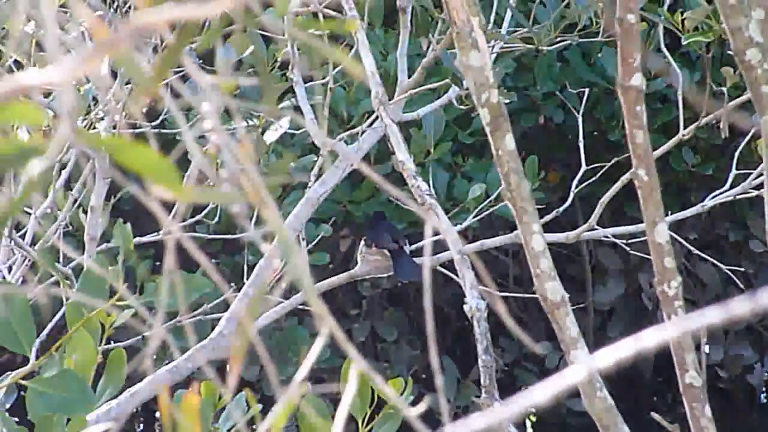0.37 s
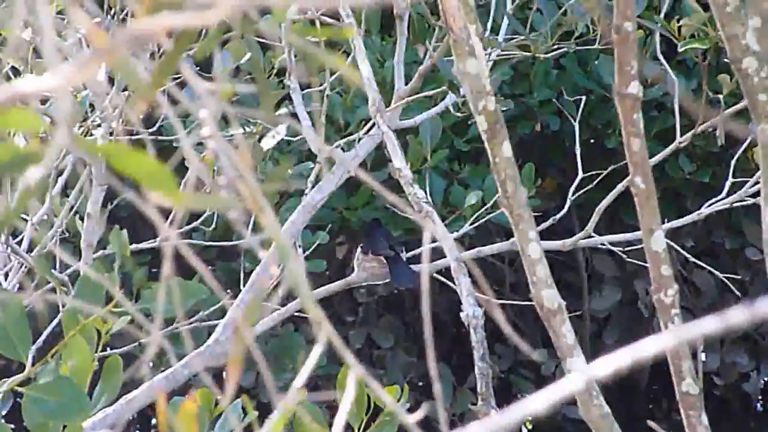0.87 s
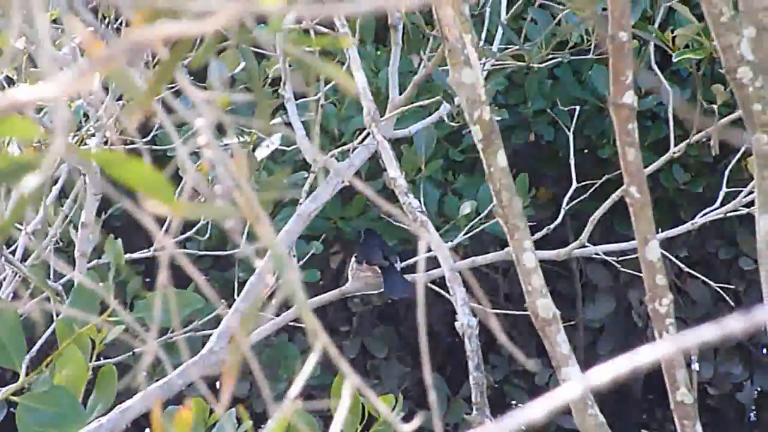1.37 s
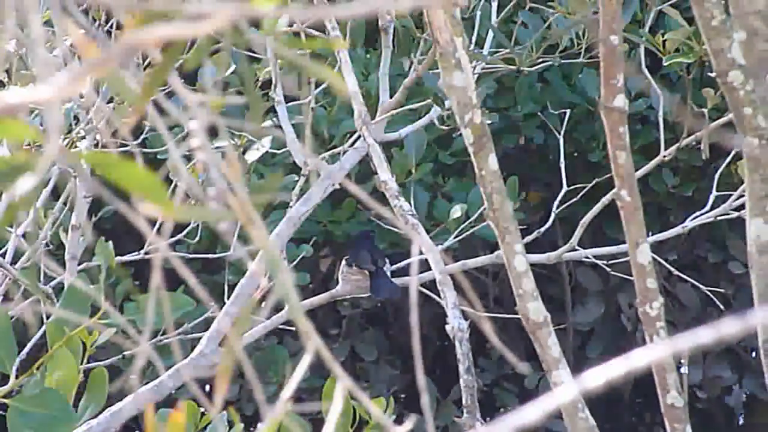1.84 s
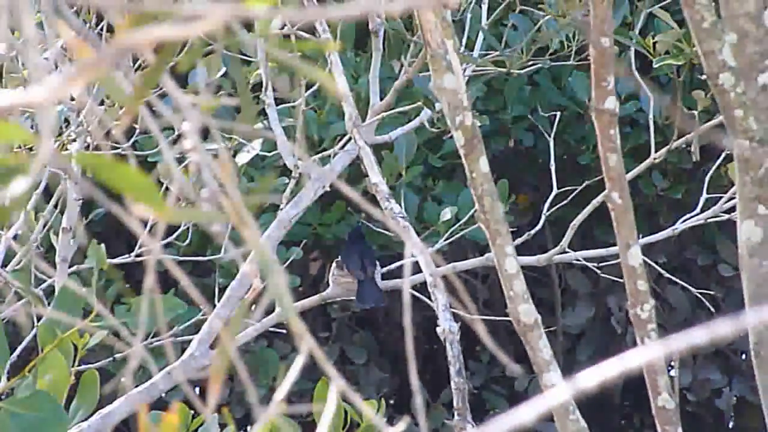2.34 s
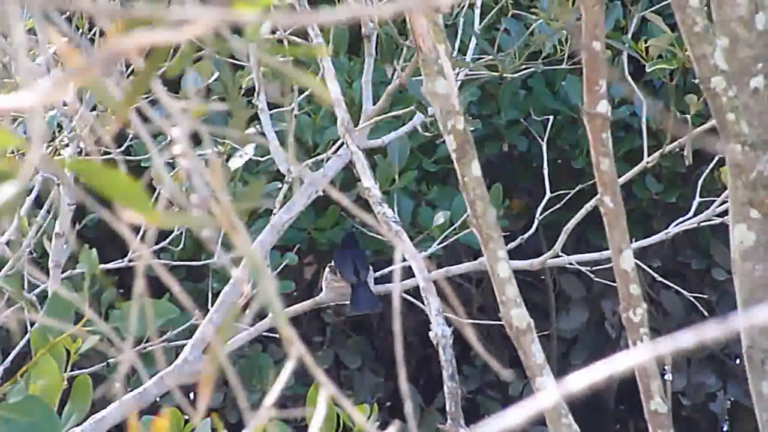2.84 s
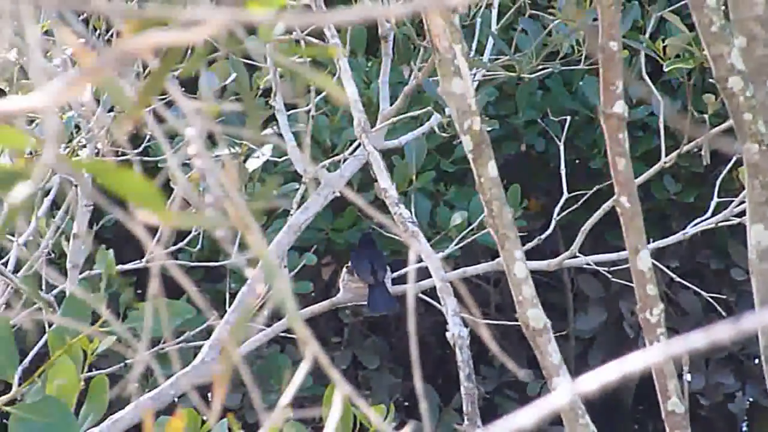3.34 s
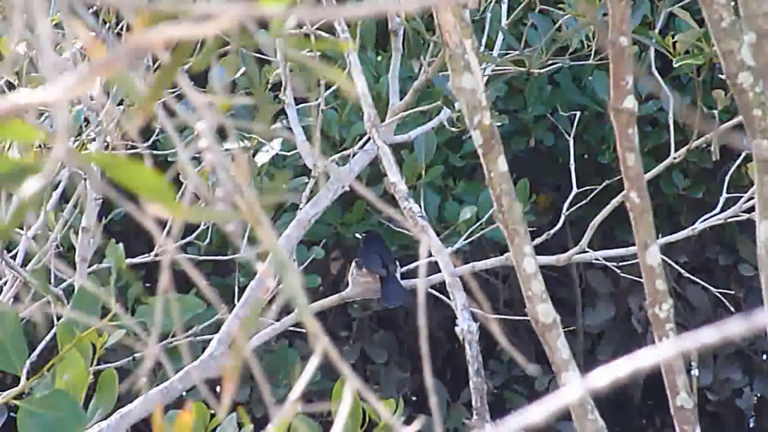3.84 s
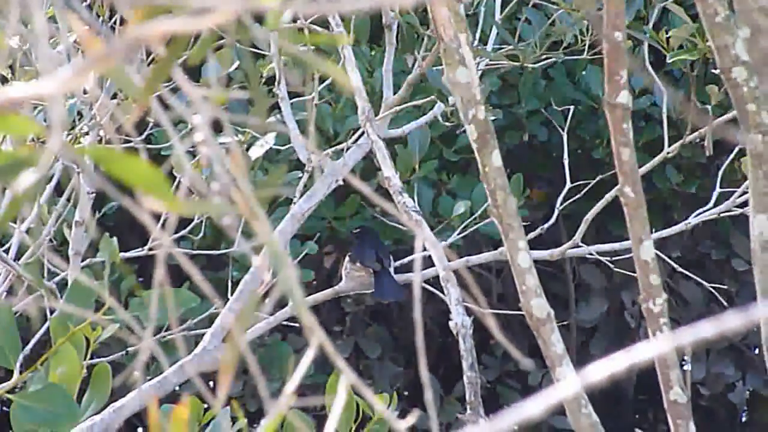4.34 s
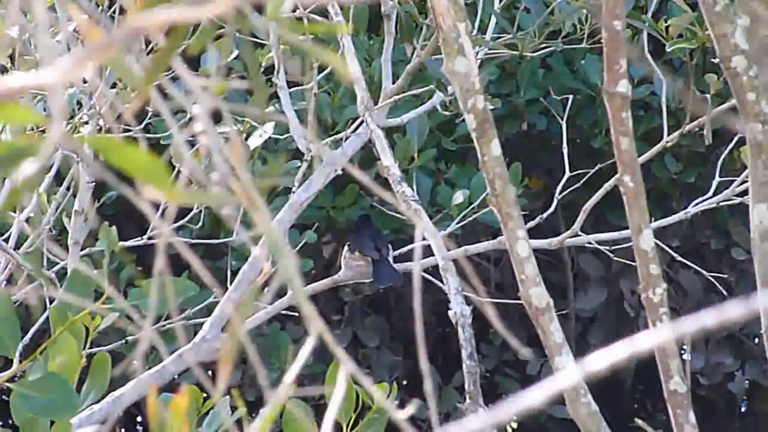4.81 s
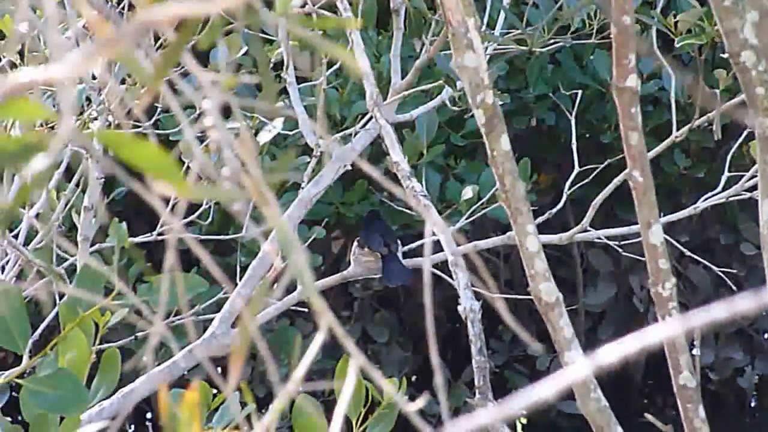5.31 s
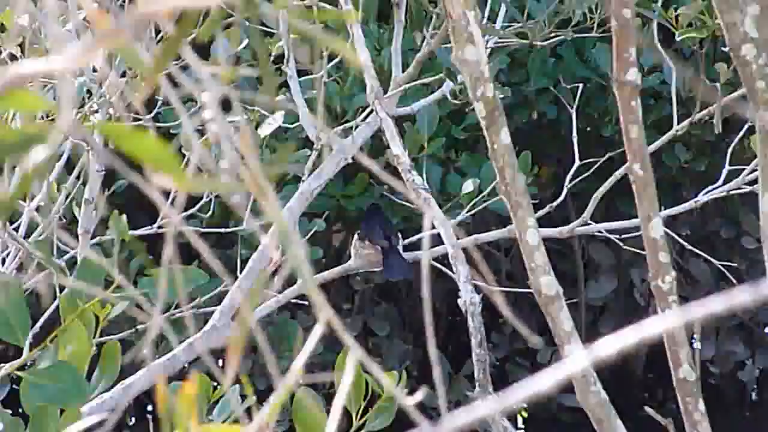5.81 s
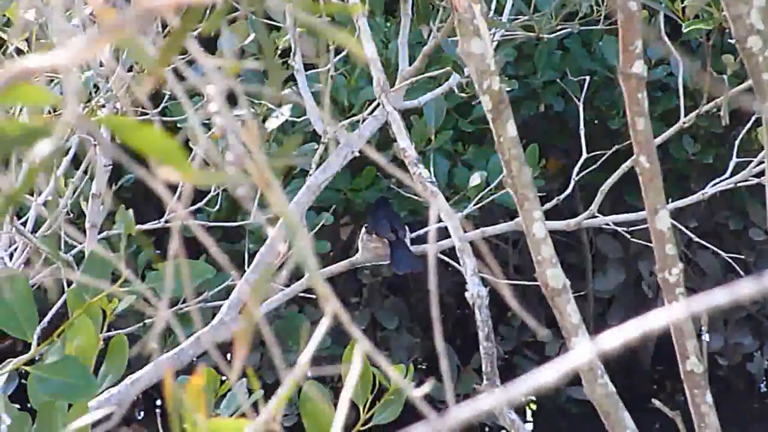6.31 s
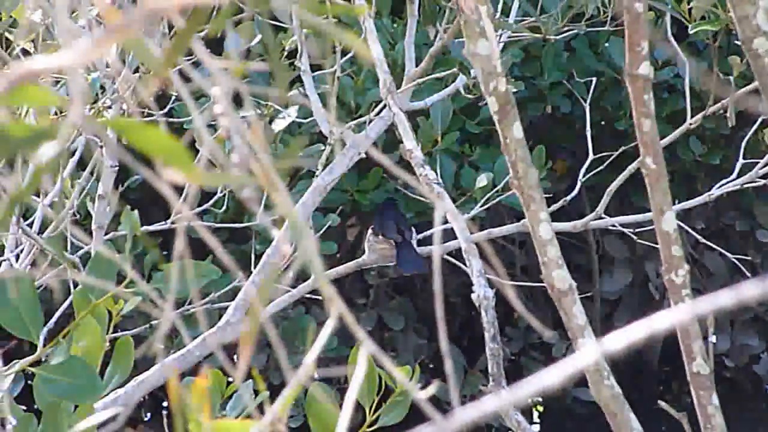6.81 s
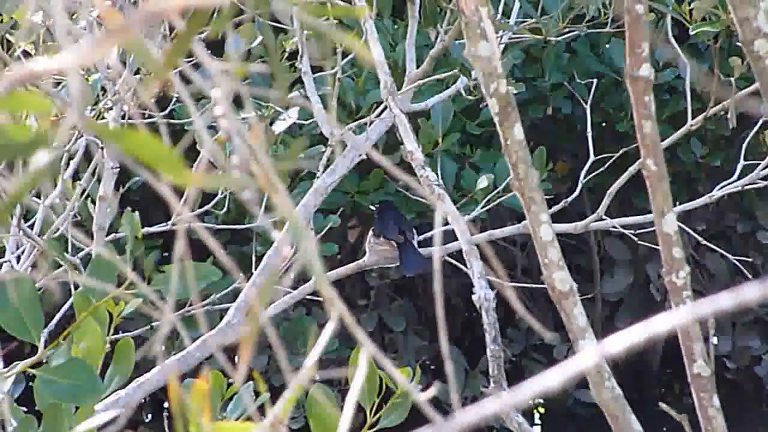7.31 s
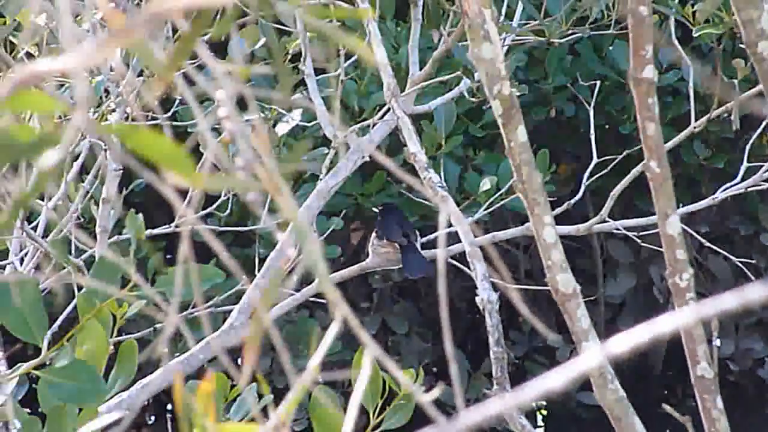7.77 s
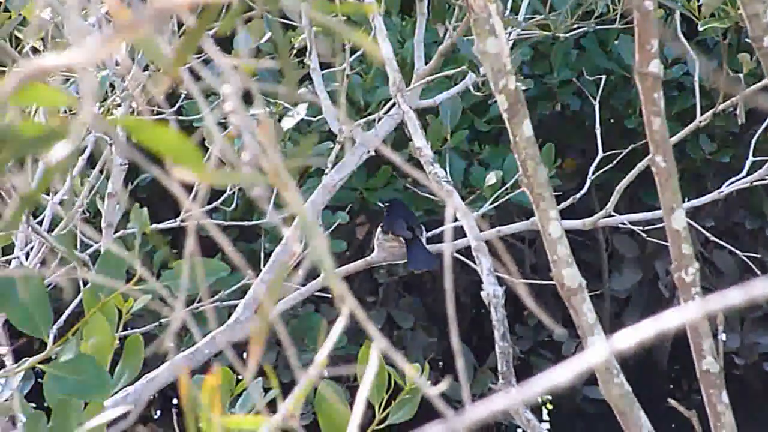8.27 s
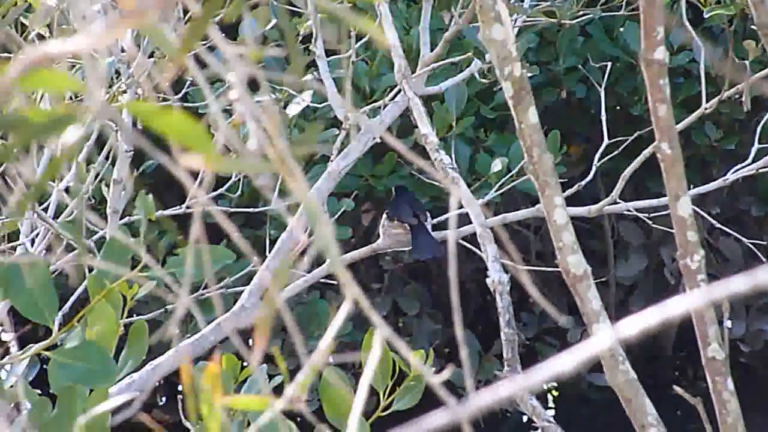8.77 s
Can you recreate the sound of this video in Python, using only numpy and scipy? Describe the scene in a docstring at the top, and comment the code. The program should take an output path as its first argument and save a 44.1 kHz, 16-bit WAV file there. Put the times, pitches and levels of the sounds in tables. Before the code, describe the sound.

A steady soft hiss of air and distant traffic runs throughout, wide and slightly uneven, with little high treble. From 0 to 1.6 s a bird slightly right gives five sharp, bright chips, growing stronger, with faint glides beside it. Around 1 s a bird on the left whistles a quick rising phrase ending in a fall; another comes at 2.9 s and a shorter one at 4.1 s. Between 1.6 and 3.5 s the right bird adds high plunging notes and snappy slurred calls, then two rolled, trill-like calls at 3.9 and 4.3 s. A far bird carols low, soft, overlapping tones from 4 to 7 s, with weak chips near 5.1 and 5.7. At 6.7-7.1 s the left bird flicks and warbles brightly. A faint slur climbs at 7.5 s, soft notes follow near 8, and a final sharp call lands at 8.8. Foliage blurs every note into a short tail.

```python
"""Birds in a thicket, over the steady hiss of air and distant traffic.
At once a bird on the right chatters chips whose octave is loudest, and a fainter one glides farther right.
Soon one on the left whistles stepped phrases; then the chatterer adds drops, slurred calls and rolled calls.
A far bird carols low notes that overlap in two voices; later the left bird flicks and warbles,
and the fainter one sings a long slur. Leaves and trunks scatter every note into a dense tail."""
import sys
import numpy as np
from scipy import signal
from scipy.fft import rfft, irfft, next_fast_len
from scipy.io import wavfile
from scipy.ndimage import uniform_filter1d

SR = 44100
rng = np.random.default_rng(int(sys.argv[2]) if len(sys.argv) > 2 else 0)


def gain_from_decibels(decibels):
    """Convert decibel values to linear amplitude factors."""
    exponent = np.asarray(decibels, float) / 20
    return 10 ** exponent


def file_out(sig):
    """Save sig as 16-bit WAV at sys.argv[1]."""
    # one column per channel
    cols = np.atleast_2d(sig).T
    # limit, then scale
    lim = np.clip(cols, -1, 1)
    pcm = np.round(lim * 32767).astype(np.int16)
    wavfile.write(sys.argv[1], SR, pcm)


N = 392490   # length of the scene in samples


def rms_one(x):
    """Scales a sound to an rms of 1."""
    return x / np.sqrt(np.mean(x ** 2) + 1e-20)


def at_hz(points, hz):
    """Reads a curve of (frequency, value) points on a log-frequency axis."""
    point_hz, value = np.array(points).T
    return np.interp(np.log(hz), np.log(point_hz), value)


def drift(rate_hz, size):
    """Random wandering of spread 1: noise smoothed so that little above rate_hz is left."""
    r = np.exp(-2 * np.pi * rate_hz / SR)
    noise = rng.standard_normal(size + 4000)
    return rms_one(signal.lfilter([1], [1, -2 * r, r * r], noise)[4000:])


# air and traffic hiss, relative spectrum: (frequency_hz, density_db per Hz)
AIR_SPECTRUM = [(18, -65), (30, -43), (79, -20.5), (222, -8.5), (394, -1.5), (700, 1), (1460, -3),
                (1800, -5), (3050, -6.5), (5410, -14.5), (6360, -16.5), (7300, -15.5), (9490, -44),
                (16100, -120)]
# how alike the hiss is left and right: (frequency_hz, likeness from -1 opposite to 1 identical)
AIR_LIKENESS = [(60, 1), (120, 0.83), (240, 0.53), (470, -0.085), (930, -0.44), (1850, -0.66),
                (3670, -0.49), (7280, 0.11)]


def air(patchy_db):
    """Third-octave bands of stereo hiss, each with its own level, slow swell and left-right likeness."""
    hiss = 0
    edges_hz = 30 * 2 ** (np.arange(26) / 3)
    white = rng.standard_normal((2, 2, N + 8000))
    for k, (low_hz, high_hz) in enumerate(zip(edges_hz, edges_hz[1:])):
        band = signal.butter(2, [low_hz, high_hz], "band", fs=SR, output="sos")
        # neighbouring bands take different noise
        mid, side = signal.sosfilt(band, white[k % 2])[:, 8000:]
        centre_hz = np.sqrt(low_hz * high_hz)
        alike = at_hz(AIR_LIKENESS, centre_hz)
        gain = gain_from_decibels(at_hz(AIR_SPECTRUM, centre_hz) + patchy_db * drift(4.1, N))
        hiss = hiss + gain * (np.sqrt(1 + alike) * mid + np.sqrt(1 - alike) * side * [[1], [-1]])
    tilt_db = np.array([[-.4], [.4]])   # the right is a little louder
    return gain_from_decibels(-49 + tilt_db) * rms_one(hiss)


def partials(hz, throat_db, beak):
    """Harmonics of a moving pitch, each weaker by up to dip_db away from the beak resonance."""
    beak_hz, width_octaves, dip_db = beak
    phase = 2 * np.pi * np.cumsum(hz) / SR
    tone = 0
    for k, partial_db in enumerate(throat_db, 1):
        octaves_off = np.log2(np.abs(k * hz / beak_hz))
        beak_db = dip_db * (np.exp(-.5 * (octaves_off / width_octaves) ** 2) - 1)
        tone = tone + gain_from_decibels(partial_db + beak_db) * np.sin(k * phase)
    return tone


def sing(notes, throat_db, beak, edge_s, waver_db, haste=1):
    """Each pitch bends along a parabola, early if haste is above 1; the syrinx opens and shuts in edge_s."""
    voice = np.zeros(N)
    waver = gain_from_decibels(waver_db * drift(280, N))
    for start_s, length_s, start_hz, middle_hz, end_hz, level_db in notes:
        t = np.arange(round(length_s * SR)) / SR
        u = 2 * (t / length_s) ** (1 / haste) - 1   # -1 at the start pitch, 1 at the end pitch
        bend_hz = (start_hz + end_hz) / 2 - middle_hz
        hz = middle_hz + u * (end_hz - start_hz) / 2 + u ** 2 * bend_hz
        opening = np.sin(np.pi / 2 * np.clip(np.minimum(t, length_s - t) / edge_s, 0, 1)) ** 2
        note = gain_from_decibels(level_db) * opening * partials(hz, throat_db, beak)
        at = round(start_s * SR)
        voice[at:at + len(t)] += note[:N - at]
    return voice * waver


def slur(phrases, throat_db, beak, waver_db, thins_db=0):
    """Each phrase slides unbroken; above 3030 Hz upper partials may thin by thins_db an octave or more."""
    voice = np.zeros(N)
    for time_s, pitch_hz, level_db in map(np.transpose, phrases):
        at = np.arange(round(time_s[0] * SR), round(time_s[-1] * SR))
        hz = uniform_filter1d(np.interp(at / SR, time_s, pitch_hz), size=90)
        thin_db = thins_db * np.maximum(np.log2(hz / 3030), 0)
        thinned_db = [partial_db - k * thin_db for k, partial_db in enumerate(throat_db)]
        voice[at] += gain_from_decibels(np.interp(at / SR, time_s, level_db)) * partials(hz, thinned_db, beak)
    return voice * gain_from_decibels(waver_db * drift(220, N))


def straight(rows):
    """Notes whose middle pitch lies halfway between start and end."""
    return [(start_s, length_s, start_hz, (start_hz + end_hz) / 2, end_hz, level_db)
            for start_s, length_s, start_hz, end_hz, level_db in rows]


def shaped(start_s, length_s, hz, level_db, shape):
    """One note bent by a shape: (start, end) pitch as multiples of its middle pitch."""
    return start_s, length_s, hz * shape[0], hz, hz * shape[1], level_db


# Levels in the note tables below come before the throat, beak, waver and scatter.
# each throat: level of the fundamental, the octave and the third partial in dB
CALL_THROAT, SWEEP_THROAT = (-4, 0, -8), (0, -38.5, -41)
GLIDE_THROAT, WARBLE_THROAT = (0, -16, -34.5), (0, -23, -50)
# each beak: (resonance_hz, width_octaves, dip_db away from it)
CHATTER_BEAK, WARBLE_BEAK, NO_BEAK = (4900, .45, 6), (6450, .06, 14), (4000, 1, 0)

# chips: (start_s of the loud hook, lead_s, pitch_hz of the loud hook, level_db, lead_level_db)
CHIP_NOTES = [(.055, 0.027, 2615, -44.5, -56.5), (.466, 0.037, 2701, -41, -54),
              (.796, 0.045, 2725, -38.5, -51.5), (1.189, 0.033, 2697, -35.5, -50.5),
              (1.619, .037, 2679, -33, -47.5), (5.085, .034, 2617, -45, -55),
              (5.697, .033, 2610, -59.5, -69)]


def chips():
    """A soft low hook leads into a louder one, which a steep falling tick trips."""
    leads, hooks, ticks = [], [], []
    for start_s, lead_s, hz, level_db, lead_db in CHIP_NOTES:
        # the lead overlaps the loud hook by 2 ms
        leads.append(shaped(start_s - lead_s, lead_s + .002, hz * .88, lead_db, (1.16, 1.005)))
        hooks.append(shaped(start_s, .02, hz, level_db, (1.116, 1.005)))
        ticks.append(shaped(start_s - .006, .0071, 4150, level_db - 8.5, (1.2, .8)))
    return (sing(leads, (-1.5, 0, -6), CHATTER_BEAK, edge_s=.003, waver_db=3.0, haste=2.2)
            + sing(hooks, (-7, 0, -8), CHATTER_BEAK, edge_s=.003, waver_db=2.0, haste=2.2)
            + sing(ticks, SWEEP_THROAT, CHATTER_BEAK, edge_s=.003, waver_db=4.5))


# the chatterer's lone sweeps: (start_s, length_s, start_hz, end_hz, level_db)
SWEEP_NOTES = [(.074, 0.017, 2310, 2310, -44.5), (.085, 0.014, 2510, 3870, -45),
               (3.468, 0.0081, 3840, 4360, -52)]


def lone_sweeps():
    """Short, nearly pure notes, level or rising in a straight line."""
    return sing(straight(SWEEP_NOTES), SWEEP_THROAT, CHATTER_BEAK, edge_s=.003, waver_db=4.5)


# the fainter bird's glides: (start_s, length_s, start_hz, end_hz, level_db)
GLIDE_NOTES = [ (.09, .128, 1620, 1485, -58), (.1, .042, 1940, 2030, -54), (.25, .016, 2760, 3540, -52.5),
               (.312, .016, 3200, 2720, -57), (.736, .01, 3200, 2620, -47), (4.84, .017, 1880, 1855, -55),
               (2.36, .032, 4550, 3520, -55), (2.395, .05, 3650, 3800, -55),
               (2.44, .075, 3800, 3780, -55.5), (8.04, .055, 2740, 2740, -65), (8.2, .29, 2860, 2925, -69),
               (8.543, .01, 2550, 2000, -47)]


def glides():
    """Soft notes sliding straight between two pitches, with a weak octave."""
    return sing(straight(GLIDE_NOTES), GLIDE_THROAT, NO_BEAK, edge_s=.006, waver_db=1.0)


# the left bird's stepped whistles: (start_s, length_s, start_hz, end_hz, level_db)
WHISTLE_NOTES = [ (.975, 0.03, 1790, 1860, -54), (.997, 0.021, 1875, 1940, -40.5),
                 (1.012, 0.03, 2160, 2260, -47.5), (1.04, .062, 2253, 2215, -42),
                 (1.095, 0.023, 2340, 2340, -42), (1.12, .072, 2282, 2380, -44),
                 (2.914, 0.019, 1970, 1950, -50), (2.974, 0.0293, 1900, 2060, -42),
                 (2.997, .027, 2160, 2305, -42), (3.027, 0.063, 2283, 2250, -39.5),
                 (3.068, 0.061, 2426, 2530, -43.5), (3.138, 0.057, 2510, 2510, -51),
                 (3.205, .09, 2470, 2520, -55), (4.09, 0.036, 1870, 1983, -41.5),
                 (4.146, .053, 2250, 2100, -36.5), (4.19, 0.0926, 2390, 2403, -39),
                 (6.736, 0.046, 2270, 2140, -42), (6.765, 0.036, 2440, 2160, -39)]


def whistles():
    """Phrases of short whistles, mostly stepping upwards, with a clear octave."""
    return sing(straight(WHISTLE_NOTES), (0, -6.5, -18), (4400, .1, 6), edge_s=.007, waver_db=2.2)


# the left bird's falls: start_s of each
FALL_STARTS_S = [1.192, 3.174, 4.33]


def falls():
    """A nearly pure fall from 2200 to 1850 Hz comes near the end of three phrases."""
    notes = [(start_s, .024, 2200, 1850, -38) for start_s in FALL_STARTS_S]
    return sing(straight(notes), WARBLE_THROAT, WARBLE_BEAK, edge_s=.004, waver_db=1.5)


# the chatterer's drops: (start_s, middle_hz, level_db)
DROP_NOTES = [(1.641, 4150, -38), (2.057, 4535, -32), (2.544, 4650, -32.5), (3.448, 4150, -32.5)]


def drops():
    """High notes that plunge in 18 ms, nearly pure."""
    notes = [shaped(start_s, .018, hz, level_db, (1.075, .809)) for start_s, hz, level_db in DROP_NOTES]
    return sing(notes, SWEEP_THROAT, CHATTER_BEAK, edge_s=.003, waver_db=4.5)


def call_voice(calls):
    """The chatterer's slurred voice, whose upper partials die as the pitch climbs."""
    return slur(calls, CALL_THROAT, CHATTER_BEAK, waver_db=2.5, thins_db=92.5)


def placed(contour, start_s, stretch, pitch_hz, level_db):
    """Sets a relative contour at its time, duration, pitch and level."""
    return np.array(contour) * [stretch, pitch_hz, 1] + [start_s, 0, level_db]


# full calls: (start_s, stretch as a multiple of time, pitch_hz, level_db, last_hook_db added to the last hook)
FULL_CALL_NOTES = [(2.007, 1.07, 2642, -36, 2), (2.497, 0.92, 2704, -37, 4), (3.391, 1, 2396, -39, 9),
                   (8.814, .98, 2584, -35.5, 4)]
# parts of a call: (time_s before stretch, pitch as a multiple of the call's, level_db over the call's)
CALL_OPENING = [(.0001, 1.2, -20), (.002, 1.1, -3.5), (.008, 1.01, -1.5), (.019, .99, -3),
                (.0225, 1.1, -0.5), (.025, 1.55, -4.5)]   # the first hook, of rolled calls too
CALL_ARCH = [(.029, 1.96, 4.5), (.032, 2.02, 1), (.035, 1.7, -1), (.0375, 1.25, -2)]
CALL_LAST_HOOK = [(0.039, 1.193, 0.5), (.046, 1.13, -2.5), (.051, 1.091, -7), (.054, 1.08, -25)]


def full_calls():
    """Hook, arch and higher hook in one unbroken slur."""
    calls = []
    for start_s, stretch, hz, level_db, last_hook_db in FULL_CALL_NOTES:
        last_hook = [(t, pitch, db + last_hook_db) for t, pitch, db in CALL_LAST_HOOK]
        calls.append(placed(CALL_OPENING + CALL_ARCH + last_hook, start_s, stretch, hz, level_db))
    return call_voice(calls)


# rolled calls: (start_s, stretch as a multiple of time, pitch_hz, level_db)
ROLLED_CALL_NOTES = [(3.917, 1.01, 2562, -33.5), (4.282, .99, 2565, -33.5)]
# the roll: (time_s before stretch, pitch as a multiple of the call's, level_db over the call's)
CALL_ROLL = [(.028, 1.82, 8.5), (.032, 1.88, 4), (.0345, 1.78, 2), (0.036, 1.5, 6), (.04, 1.2, -15.5),
             (.045, 1.1, -7), (.052, 1.76, 1.5), (.056, 1.6, 8), (0.064, 1.36, -1), (.066, 1.3, -12),
             (0.074, 1.5, 1.5), (.082, 1.42, 0.5), (0.093, 1.4, -4), (.097, 1.2, -34)]


def rolled_calls():
    """A hook and three shrinking arches in one unbroken slur."""
    return call_voice([placed(CALL_OPENING + CALL_ROLL, *row) for row in ROLLED_CALL_NOTES])


# the far bird's carol: (start_s, length_s, start_hz, end_hz, level_db)
CAROL_NOTES = [ (3.97, .14, 910, 862, -56), (4.2, 0.22, 897, 908, -54.5), (4.42, .22, 916, 905, -55.5),
               (4.23, 0.069, 988, 941, -47.5), (4.3, 0.2, 1000, 991, -50.5), (4.45, .07, 991, 923, -50.5),
               (4.87, 0.092, 1275, 1270, -58), (4.56, 0.14, 1405, 1400, -59),
               (4.76, 0.17, 1066, 1122, -54.5), (5.23, 0.06, 1086, 1077, -51.5),
               (5.36, 0.097, 1025, 1030, -48.5), (5.545, 0.074, 1012, 1060, -50.5),
               (5.8, 0.049, 877, 860, -50), (5.94, 0.096, 852, 846, -53.5),
               (6.135, 0.075, 1041, 1040, -45.5), (6.3, .15, 1053, 1045, -54.5),
               (6.69, 0.097, 1335, 1235, -54.5), (6.71, .11, 1110, 1183, -54), (6.66, 0.19, 842, 858, -58),
               (6.86, 0.085, 1320, 1293, -59.5), (6.9, 0.064, 1142, 1134, -51),
               (7.05, 0.043, 920, 916, -50.5), (7.94, 0.09, 960, 949, -53.5),
               (8.07, 0.056, 925, 910, -53.5)]


def carol():
    """Low pure tones with soft edges, some overlapping like two voices."""
    return sing(straight(CAROL_NOTES), (0,), NO_BEAK, edge_s=.02, waver_db=3.5)


# the left bird's flicks around the warble: (start_s, length_s, start_hz, end_hz, level_db)
FLICK_NOTES = [ (6.676, .012, 2640, 1900, -36), (6.686, .02, 1980, 2050, -38),
               (6.692, .008, 3250, 4200, -39), (6.724, .016, 2890, 3950, -33.5),
               (6.728, 0.014, 2190, 3100, -33), (6.73, .01, 1640, 2300, -35),
               (6.74, 0.027, 1620, 1500, -36), (6.738, .019, 3100, 3080, -35),
               (6.78, 0.019, 3670, 3450, -37), (6.79, .064, 2300, 2350, -28.5),
               (6.845, .012, 2130, 1950, -33.5), (6.87, 0.054, 2480, 1830, -39),
               (7.125, 0.0071, 5600, 3830, -32)]


def flicks():
    """Quick, nearly pure notes sliding up or down."""
    return sing(straight(FLICK_NOTES), WARBLE_THROAT, WARBLE_BEAK, edge_s=.004, waver_db=1.5)


# the left bird's warble, two phrases of points: (time_s, pitch_hz, level_db)
WARBLE_PHRASES = [
    [(6.8, 3020, -47), (6.806, 3380, -33), (6.818, 3850, -23.5), (6.83, 3950, -18), (6.838, 3420, -22),
     (6.845, 2400, -31.5)],
    [(6.86, 2500, -51), (6.866, 2710, -26.5), (6.882, 3166, -24), (6.8835, 3290, -45), (6.8845, 4220, -48),
     (6.887, 4090, -13), (6.892, 3967, -16.5), (6.9, 4075, -14), (6.916, 3640, -16), (6.92, 3096, -17),
     (6.95, 3073, -19.5), (6.972, 3235, -17), (6.984, 3287, -16.5), (6.993, 3020, -41)],
]


def warble():
    """Two slurred phrases that leap and slide, nearly pure."""
    return slur(WARBLE_PHRASES, WARBLE_THROAT, WARBLE_BEAK, waver_db=1.2)


# the fainter bird's one long phrase, as points: (time_s, pitch_hz, level_db)
LONG_GLIDE_PHRASE = [
    [(7.526, 2220, -66), (7.535, 2330, -54), (7.558, 2548, -49.5), (7.595, 2560, -48.5), (7.605, 2704, -50),
     (7.609, 2397, -49), (7.617, 2404, -49), (7.621, 2995, -57), (7.629, 3110, -60), (7.635, 2750, -52),
     (7.655, 2757, -49.5), (7.667, 2830, -54), (7.674, 2930, -62), (7.73, 2980, -57), (7.8, 3200, -63),
     (7.89, 3250, -70)],
]


def long_glide():
    """One long soft slur that climbs with small leaps."""
    return slur(LONG_GLIDE_PHRASE, GLIDE_THROAT, NO_BEAK, waver_db=1.5)


def through_twigs(voice):
    """Eight close reflections within 12 ms roughen fast sweeps into several strands."""
    taps = np.zeros(SR // 20)
    delay, size = rng.random((8, 2)).T
    taps[(delay * .012 * SR).astype(int)] = gain_from_decibels(-8) * (2 * size - 1)   # -8 dB at most, either sign
    taps[0] = 1   # the direct sound
    return signal.fftconvolve(voice, taps)[:N]


def heard_from(voice, pan_db, left_lag_s, scatter_db):
    """Direct sound plus a dense scattered tail that swells, then dies; all of it leans to the singer's side."""
    rise_s, t60_s = .01, .59
    alike = .65   # share of the scatter's power common to both ears
    t = np.arange(SR // 2) / SR
    near = (1 - np.exp(-t / rise_s)) * gain_from_decibels(-60 * t / t60_s)
    # a row of trees farther off sends back a smeared echo
    tree_line = gain_from_decibels(-15.5) * np.exp(-.5 * ((t - .093) / .051) ** 2)
    swell = np.hypot(near, tree_line)
    shared, left, right = rng.standard_normal((3, len(t))) * swell / np.sqrt(np.sum(swell ** 2))
    common = voice + gain_from_decibels(scatter_db) * np.sqrt(alike) * signal.fftconvolve(voice, shared)[:N]
    # shift the left ear by a tiny lag; a negative lag makes it lead
    size = next_fast_len(N)
    turn = np.exp(-2j * np.pi * np.fft.rfftfreq(size, 1 / SR) * left_lag_s)
    shifted = irfft(rfft(common, size) * turn, size)[:N]
    spread = np.array([signal.fftconvolve(voice, side)[:N] for side in (left, right)])
    pan = gain_from_decibels(np.array([[pan_db / 2], [-pan_db / 2]]))   # pan_db is left over right
    return pan * ([shifted, common] + gain_from_decibels(scatter_db) * np.sqrt(1 - alike) * spread)


def scene():
    """Four singers, each in its place, over the hiss."""
    chatterer = through_twigs(chips() + lone_sweeps() + drops() + full_calls() + rolled_calls())
    fainter = glides() + long_glide()
    whistler = whistles() + falls() + flicks() + warble()
    return (air(patchy_db=1.5)
            + heard_from(chatterer, pan_db=-3.6, left_lag_s=.00002, scatter_db=2.2)
            + heard_from(fainter, pan_db=-4, left_lag_s=.00002, scatter_db=-8)
            + heard_from(whistler, pan_db=8, left_lag_s=-.00004, scatter_db=-8)
            + heard_from(carol(), pan_db=0, left_lag_s=.00001, scatter_db=-5))


def top_cut(x):
    """Nothing passes above the cut-off."""
    return signal.sosfilt(signal.butter(12, 7880, fs=SR, output="sos"), x)


def record(dry):
    """The microphone pair cuts the bass, steeply cuts the treble and adds faint self-noise."""
    bass_cut = signal.butter(2, 65, "high", fs=SR, output="sos")
    treble_cut = signal.cheby2(10, 60, 8630, fs=SR, output="sos")   # 60 dB down from 8630 Hz up
    heard = signal.sosfilt(treble_cut, signal.sosfilt(bass_cut, dry))
    mix = heard + gain_from_decibels(-103) * rng.standard_normal(dry.shape)
    return top_cut(mix)


dry = scene()
out = record(dry)
file_out(out)
```